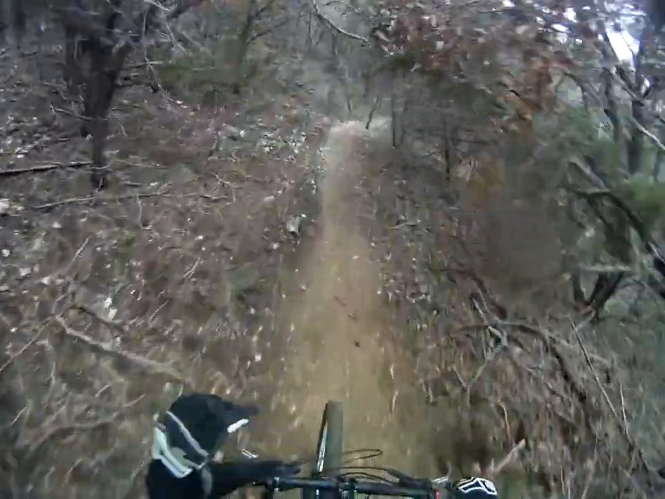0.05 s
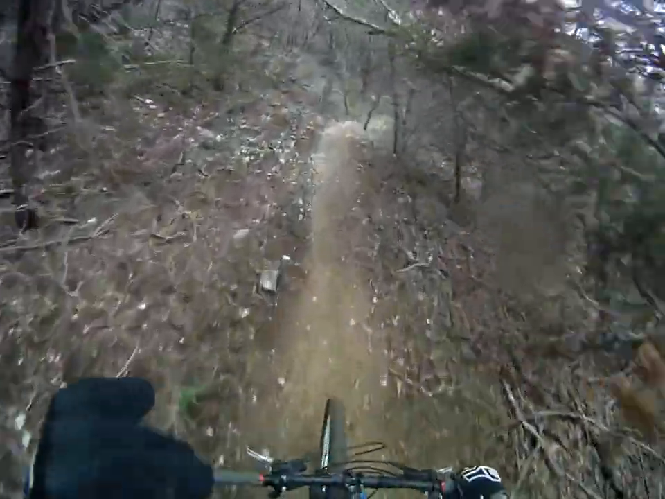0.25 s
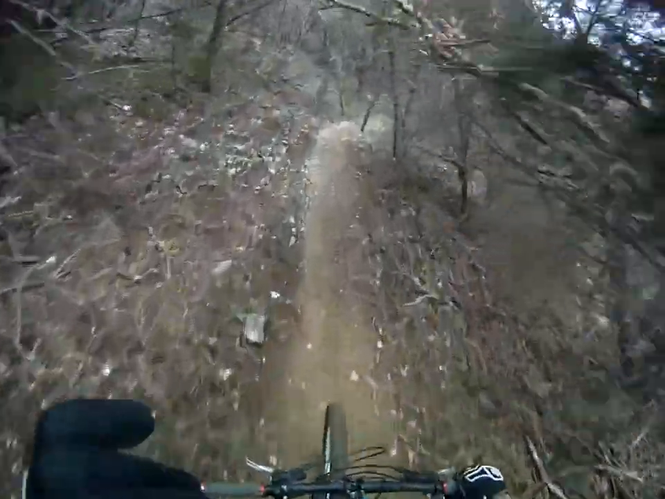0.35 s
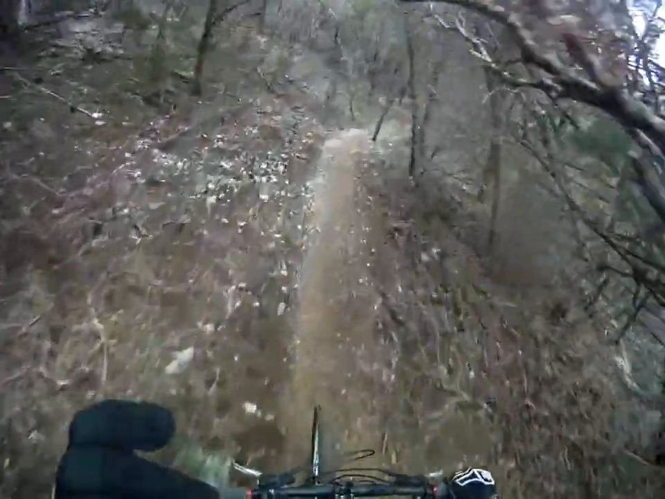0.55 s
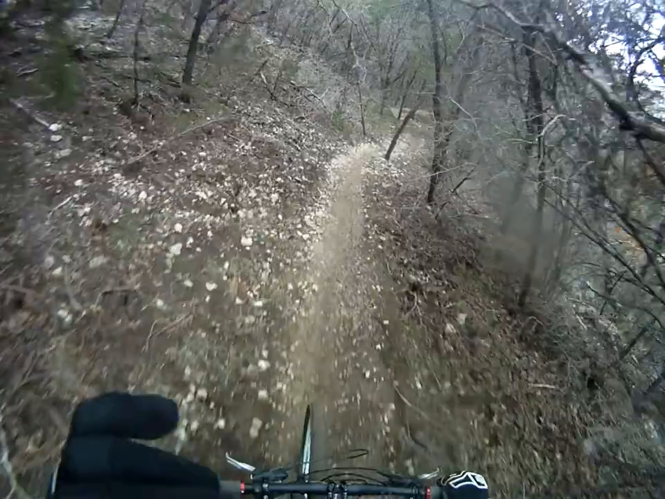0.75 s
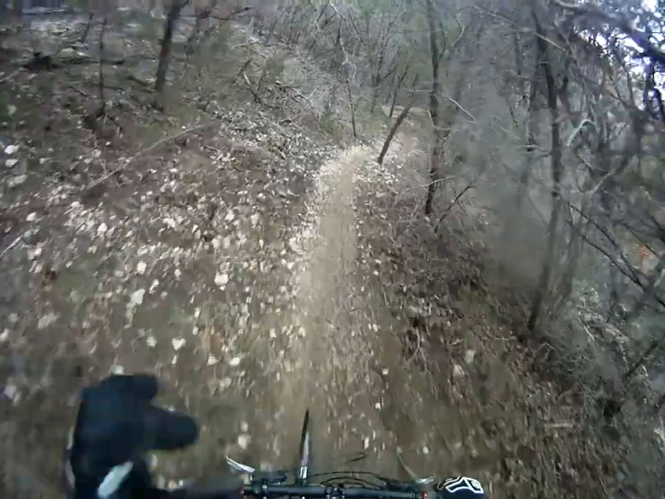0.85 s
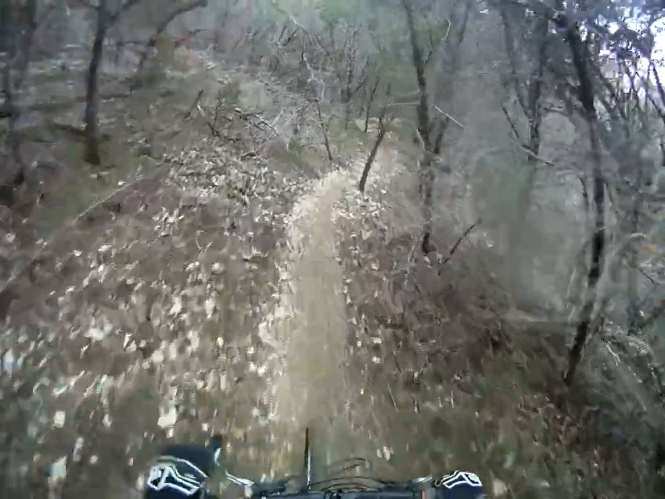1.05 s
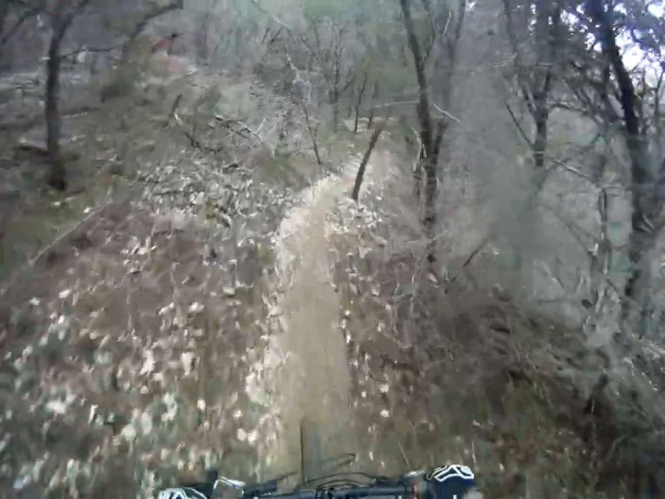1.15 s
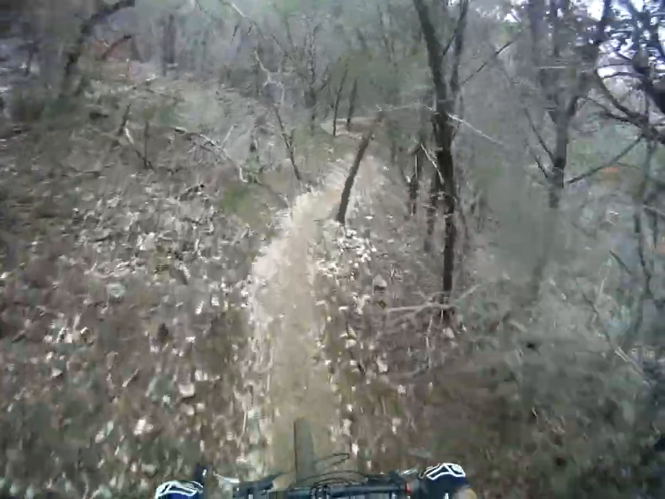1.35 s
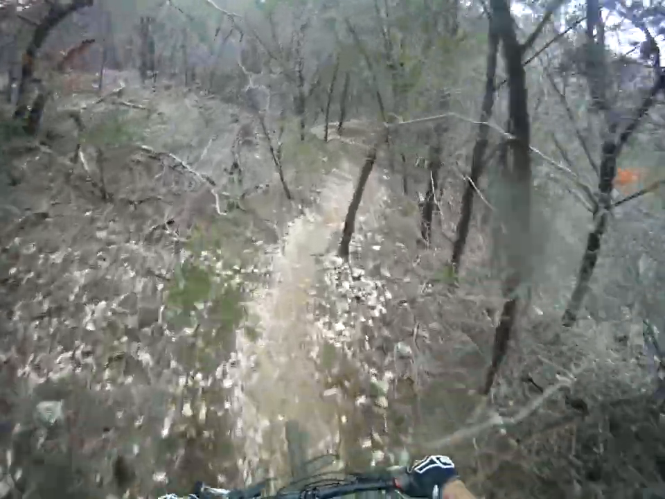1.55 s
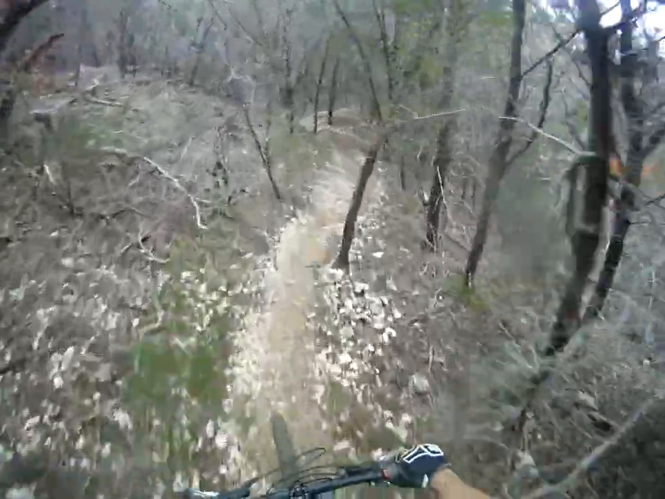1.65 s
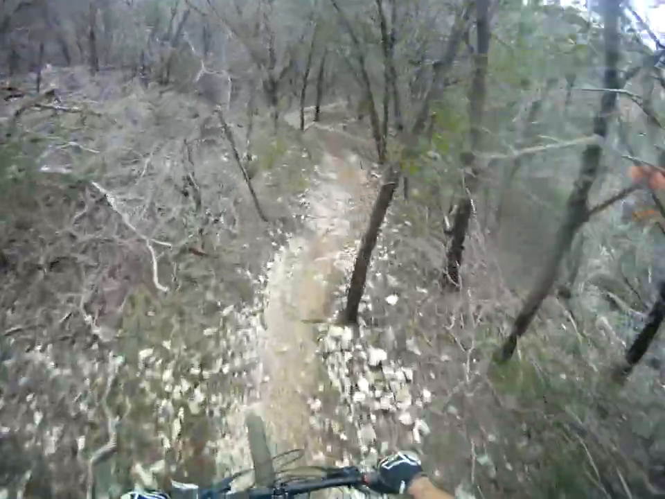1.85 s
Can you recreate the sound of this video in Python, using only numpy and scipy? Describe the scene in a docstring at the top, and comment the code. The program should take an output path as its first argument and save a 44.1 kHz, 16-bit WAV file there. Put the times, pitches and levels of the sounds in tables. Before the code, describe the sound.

A mountain bike rolls along a dirt trail throughout, tyres humming and crunching grit while wind and jolts rumble on the microphone. At about 0.4 seconds a hard, chattering knock rings through the bike and briefly overloads the sound. A short gravel skid follows from 0.6 to 0.8 seconds, with a softer knock at 0.7. From 1 second on, small metal parts and stones tick irregularly.

```python
"""On a dirt trail, a mountain bike rolls downhill, heard from a camera in a case on the rider.
Wind and jolts rumble on the case, the tyres hum and crunch over grit, and small parts tick.
One hard, chattering knock sets the bike ringing and overloads the microphone, so the camera briefly
turns its volume down. A softer knock and a short skid on gravel follow."""
import sys
import numpy as np
from scipy import signal
from scipy.fft import rfft, irfft, next_fast_len
from scipy.io import wavfile
from scipy.ndimage import uniform_filter1d

SR = 44100
rng = np.random.default_rng(int(sys.argv[2]) if len(sys.argv) > 2 else 0)


def int16_out(signal):
    """Quantize to a 16-bit WAV file."""
    q = np.round(np.clip(np.atleast_2d(signal).T, -1, 1) * 32767)
    wavfile.write(sys.argv[1], SR, q.astype(np.int16))


N = 83790
TIME = np.arange(N) / SR

# How loud each steady sound is as the ride goes on. Each row: time in seconds, level in dB.
WIND_LEVELS = [(0, -27), (.15, -29.5), (.24, -24), (.4, -25), (.5, -28), (.62, -21), (.7, -26), (.78, -25),
               (.93, -29), (1.03, -29.5), (1.18, -30.5), (1.33, -28.5), (1.45, -24), (1.62, -29.5),
               (1.78, -33), (1.9, -31)]  # wind and shaking on the case
DRONE_LEVELS = [(0, -37), (.4, -40.5), (.52, -46.5), (.63, -36), (.74, -36), (.85, -43), (1.0, -38),
                (1.12, -43.5), (1.25, -38.5), (1.55, -37), (1.75, -39.5), (1.9, -37)]  # the hum of rolling tyres
GRIT_LEVELS = [(0, -45.5), (.14, -50), (.24, -52), (.3, -44), (.34, -52), (.4, -42), (.52, -48),
               (.6, -54.5), (.69, -48.5), (.78, -48), (.86, -51.5), (1.0, -52.5), (1.27, -54), (1.5, -56.5),
               (1.65, -51.5), (1.81, -55.5), (1.87, -52)]  # grit being crushed
DIRT_LEVELS = [(0, -47), (.15, -46.5), (.27, -50.5), (.4, -49.5), (.5, -68), (1.55, -61.5), (1.8, -57),
               (1.88, -45)]  # the duller rush of soft dirt
# The tone of each noise, from bass to treble. Each row: frequency in Hz, relative strength in dB.
WIND_TONE = [(12, -1.5), (25, 4), (45, 3), (75, 2.5), (110, -4), (160, -8), (250, -19), (400, -38.5),
             (800, -58), (2000, -107)]
SIZZLE_TONE = [(9000, -47), (11100, -13), (11600, -3.5), (12100, 2), (12500, -6), (13000, -33),
               (15000, -43)]
DRONE_TONE = [(60, -5.5), (180, 4), (300, 0), (450, -3), (620, -5), (800, -25.5), (1050, -26.5),
              (2000, -65), (5000, -51)]
GRIT_TONE = [(200, 1.5), (700, 1), (1400, 2.5), (2000, -2), (2900, 0.5), (4000, -8.5), (5200, -12.5),
             (5850, -28), (6250, -22.5), (6900, -13.5), (8000, -14.5), (9200, -8.5), (11000, -16),
             (13000, -15), (15000, -12), (16000, -31.5)]
DIRT_TONE = [(250, -12), (520, 11), (850, -5.5), (1400, 4), (2400, -7.5), (3500, -17), (6000, -39)]
SKID_TONE = [(200, 6.5), (600, 3), (900, -4), (1600, -3.5), (2200, 3.5), (3100, -1), (4600, -8),
             (5400, -13.5), (5850, -36), (6250, -22), (6900, -13.5), (9500, -8), (11000, -23), (12800, -21),
             (14800, -10), (16000, -26)]
TICK_TONE = [(300, 7.5), (700, 10.5), (1100, 8), (2000, 2), (3000, 1), (4200, -14.5), (5200, -11.5),
             (5850, -34), (6250, -35), (6900, -17.5), (9200, -8.5), (11000, -14), (13000, -14),
             (15000, -10), (16000, -14)]
CRACK_TONE = [(100, -6.5), (350, -13.5), (600, -8), (850, -15.5), (1220, -4.5), (1750, -11), (2300, -0.5),
              (3400, 0), (4600, -8.5), (5400, -7.5), (6000, -18), (6800, -10.5), (8700, -3), (10500, -22),
              (12200, -36), (14000, -20.5), (15000, -8), (16000, -18)]
# Jolts that thump the case. Each row: time of the peak in seconds, level in dB, width in seconds.
CASE_JOLTS = [(0.051, -21, .006), (0.217, -15, .002), (.234, -13, 0.0047), (0.3593, -13.5, 0.0036),
              (0.412, -9, 0.0031), (0.4159, -3, 0.00041), (.592, -21.5, 0.0029), (0.633, -14.5, 0.0024),
              (0.7765, -15, 0.0029), (1.235, -17, 0.0026), (1.303, -6, 0.0032), (1.36, -22, 0.0021),
              (1.415, -18, 0.0061), (1.429, -13, 0.0039), (1.503, -14.5, 0.0021)]
# Tyre scrapes. Each row: start in seconds, level in dB, seconds to swell, seconds until the fade begins.
TYRE_SKIDS = [(0.558, -43.5, 0.092, 0.099), (0.715, -39, 0.0011, 0.043), (1.838, -50, 0.028, 0.051)]
# Ticks of cables, chain and flung stones. Each row: start in seconds, level in dB, metal share (0 to 1).
SMALL_TICKS = [(0.176, -31, 0.1), (0.269, -36, 0.07), (0.3573, -29, 0.32), (0.596, -41.5, 0.3),
               (1.056, -42, 0.75), (1.073, -32.5, 0.7), (1.125, -44, 0.3), (1.1659, -39.5, 0.82),
               (1.173, -38, .8), (1.191, -49, 0.8), (1.198, -48, 0.6), (1.2117, -36, 0.6),
               (1.3014, -36.5, 0), (1.322, -44.5, 0.4), (1.363, -46, 0.35), (1.387, -39.5, 0),
               (1.437, -43, 0.22), (1.4735, -39.5, 0.01), (1.507, -41, 0.86), (1.514, -37.5, 0.1),
               (1.543, -47, .9), (1.607, -35, 0.13), (1.6475, -42, 0), (1.6683, -35.5, 0.04),
               (1.677, -52, 0.2), (1.7085, -41, 0.36), (1.7485, -37, 0), (1.7937, -35, 0),
               (1.8367, -38.5, 0), (1.8654, -35, 0), (1.878, -32, .1)]
# The quick hits that make up the hard knock. Each row: start in seconds, relative level in dB,
# frequency in Hz above which the hit gets duller.
HARD_HITS = [(0.4149, -1, 20000), (.4160, -0.5, 15900), (.4180, 2, 7000), (0.4196, -3, 6020),
             (0.4218, -3, 12000), (.4250, -3, 8000), (0.429, 1, 12000), (0.4326, 3, 8000),
             (.4420, -15.5, 5000), (.4535, -22, 7000), (0.4561, -25.5, 7000), (0.4637, -37.5, 5000),
             (0.4734, -25, 2000), (0.484, -29.5, 1200)]
# The notes that struck parts ring with. Each row: pitch in Hz, relative level in dB,
# seconds to fade by 60 dB.
TICK_NOTES = [(2927, -5, 0.023), (3050, -12, 0.015), (3340, -10, 0.031), (9030, -13, 0.018)]
SOFT_KNOCK_NOTES = [(606, -28.5, 0.064), (2010, -29.5, 0.056), (2620, -34.5, 0.03), (3090, -37, 0.032)]
HARD_KNOCK_NOTES = [(626, -18, 0.046), (1177, -10.5, 0.044), (1252, -19, 0.032), (2284, -12, 0.046),
                    (2423, -12.5, 0.031), (2840, -19, 0.017), (3043, -9.5, .035), (3395, -6, 0.032),
                    (3780, -12.5, 0.037), (3890, -8.5, .026), (4300, -13, .03), (5450, -10, 0.011),
                    (6290, -22.5, 0.02), (8780, -14, 0.028), (9000, -20, .024)]


def from_db(db):
    """Turn decibels into a number to multiply by."""
    return 10 ** (np.asarray(db) / 20)


def unit_power(x):
    """Scale a signal so that its average power is 1."""
    return x / np.sqrt(np.mean(x ** 2) + 1e-20)


def level(points):
    """A volume curve drawn through (seconds, dB) points."""
    return from_db(np.interp(TIME, *np.transpose(points)))


def colour(x, tone):
    """Filter a sound by a tone table; plain white noise keeps its power."""
    size = 2 * next_fast_len(N)
    hz, db = np.transpose(tone)
    all_hz = np.arange(size // 2 + 1) * SR / size
    gain = unit_power(from_db(np.interp(np.log(all_hz + 1), np.log(hz), db)))
    # these steps keep the filter from sounding before its input does
    cepstrum = irfft(np.log(gain))
    cepstrum[1:size // 2] *= 2
    cepstrum[size // 2 + 1:] = 0
    return irfft(rfft(x, size) * np.exp(rfft(cepstrum)))[:N]


def soften(x, hz):
    """Gently turn down everything above hz."""
    r = np.exp(-2 * np.pi * hz / SR)
    return signal.lfilter([1 - r], [1, -r], x + 1e-18)


def ring(clicks, hz, fade_s):
    """Each click starts a pure note that fades by 60 dB in fade_s seconds."""
    r = np.exp(-np.log(1000) / (fade_s * SR))
    w = 2 * np.pi * hz / SR
    return signal.lfilter([0, np.sin(w)], [1, -2 * r * np.cos(w), r * r], clicks + 1e-18)


def burst(start, fade_s, hold_s=0):
    """A volume curve that jumps up, holds, then fades by 60 dB in fade_s seconds."""
    return (TIME >= start) * np.exp(-np.log(1000) * np.clip((TIME - start - hold_s) / fade_s, 0, 10))


def grains(snaps_per_s=900, spread_db=3, snap_share=0.54):
    """Bits of grit snap at random, some louder than others, over a fine hiss."""
    sizes = from_db(spread_db * np.minimum(rng.exponential(1, N), 4)) * rng.choice([-1, 1], N)
    snaps = unit_power(sizes * (rng.random(N) < snaps_per_s / SR))
    return np.sqrt(snap_share) * snaps + np.sqrt(1 - snap_share) * rng.standard_normal(N)


def case_rumble():
    """Wind and jolts push on the case; a thin sizzle swells along with the rumble."""
    wind = colour(rng.standard_normal(N), WIND_TONE)
    wind = wind - soften(wind, hz=12.9)  # take out the slowest drift
    wind_strength = np.sqrt(uniform_filter1d(wind ** 2, size=2000))
    rumble = level(WIND_LEVELS) * wind / wind_strength
    for peak_s, db, width_s in CASE_JOLTS:
        spread = ((TIME - peak_s) / width_s) ** 2
        rumble += from_db(db) * (1 - spread) * np.exp(-np.minimum(spread, 50))
    swell = soften(np.abs(rumble), hz=60)
    sizzle = swell * colour(rng.standard_normal(N), SIZZLE_TONE)
    return rumble + from_db(-37) * sizzle


def tyres(bump_hz=25, wobble_db=2):
    """Tyres hum unevenly on rough ground, crunch grit, rush over dirt and briefly skid."""
    bumps = unit_power(soften(soften(rng.standard_normal(N), bump_hz), bump_hz))
    wobble = unit_power(from_db(wobble_db * bumps))
    drone = level(DRONE_LEVELS) * colour(wobble * rng.standard_normal(N), DRONE_TONE)
    grit = colour(level(GRIT_LEVELS) * grains(), GRIT_TONE)
    dirt = colour(level(DIRT_LEVELS) * grains(), DIRT_TONE)
    slip = np.zeros(N)
    for start, db, swell_s, hold_s in TYRE_SKIDS:
        swell = np.clip((TIME - start) / swell_s, 0, 1)
        slip += from_db(db) * swell * burst(start, fade_s=0.088, hold_s=hold_s)
    skids = colour(slip * grains(), SKID_TONE)
    return drone + grit + dirt + skids


def ticks():
    """Tiny rattles that die at once: stones give a dry snap, metal parts ring."""
    snaps, clicks = np.zeros(N), np.zeros(N)
    for start, db, metal in SMALL_TICKS:
        snaps += from_db(db) * np.sqrt(1 - metal) * burst(start, fade_s=0.023)
        clicks[int(start * SR)] = from_db(db) * np.sqrt(metal)
    ringing = np.zeros(N)
    for hz, db, fade_s in TICK_NOTES:
        uneven_clicks = clicks * from_db(rng.normal(0, 4.4, N))
        ringing += from_db(db) * ring(uneven_clicks, hz, fade_s)
    return colour(snaps * rng.standard_normal(N), TICK_TONE) + ringing


def soft_knock(start=0.7106):
    """A lighter hit just before the loudest skid: a brief crack and a few ringing notes."""
    click = np.zeros(N)
    click[int(start * SR)] = 1
    crack = colour(burst(start, fade_s=0.031) * rng.standard_normal(N), SKID_TONE)
    ringing = sum(from_db(db) * ring(click, hz, fade_s) for hz, db, fade_s in SOFT_KNOCK_NOTES)
    return from_db(-27) * crack + ringing


def hard_knock(crack_db=6.5, ring_db=2):
    """A quick run of hard hits: each one cracks and sets all the bike's notes ringing."""
    cracks = np.zeros(N)
    for start, db, bright_hz in HARD_HITS:
        crack = from_db(db) * burst(start, fade_s=0.02) * rng.standard_normal(N)
        cracks += soften(crack, bright_hz)
    starts, hit_db, bright_hz = np.transpose(HARD_HITS)
    ringing = np.zeros(N)
    for hz, note_db, fade_s in HARD_KNOCK_NOTES:
        strength = from_db(ring_db + hit_db + note_db + rng.normal(0, 0.67, len(starts)))
        strength /= np.hypot(1, hz / bright_hz)  # dull hits ring the high notes less
        clicks = np.zeros(N)
        clicks[(starts * SR).astype(int)] = strength * rng.choice([-1, 1], len(starts))
        ringing += ring(clicks, hz, fade_s)
    return from_db(crack_db) * colour(cracks, CRACK_TONE) + ringing


def scene():
    """Add up all the sounds; left and right are almost alike."""
    middle = case_rumble() + tyres() + ticks() + hard_knock() + soft_knock()
    side = from_db(-51.5) * (case_rumble() + tyres())
    return np.array([middle + side, middle - side])


def record(dry, limit_db=3, attack_s=0.0018, recover_db_per_s=76.5, top_hz=15050):
    """The camera turns down for loud peaks, chops off what is still too big and cuts the top treble."""
    peak_db = 20 * np.log10(np.abs(dry).max(axis=0) + 1e-9)
    over_db = np.maximum(peak_db - limit_db, 0)
    recovery_db = recover_db_per_s * TIME
    held_db = np.maximum.accumulate(over_db + recovery_db) - recovery_db  # the volume creeps back
    smooth_db = soften(held_db, 1 / (2 * np.pi * attack_s))
    cut_db = np.interp(TIME + attack_s, TIME, smooth_db)  # act just ahead of the peak
    clipped = np.clip(dry * from_db(-cut_db), -1, 1)
    treble_cut = signal.ellip(10, 0.2, 70, top_hz, fs=SR, output="sos")
    return signal.sosfilt(treble_cut, clipped)


dry = scene()
out = record(dry)
int16_out(out)
```